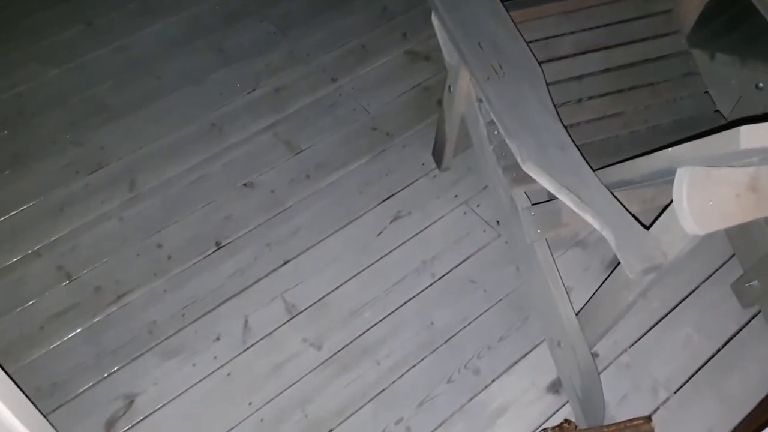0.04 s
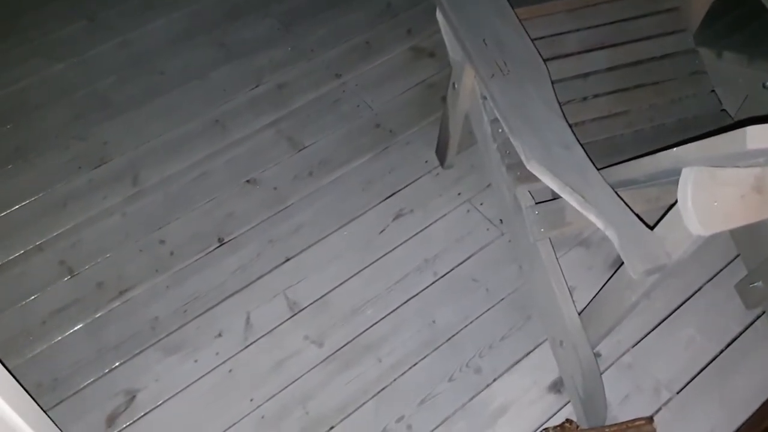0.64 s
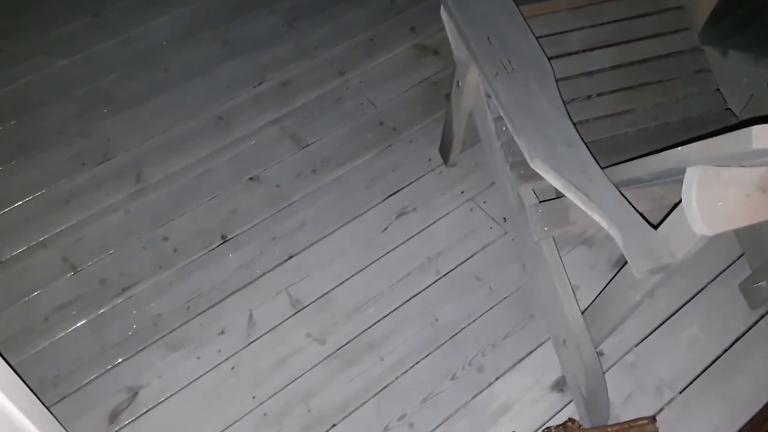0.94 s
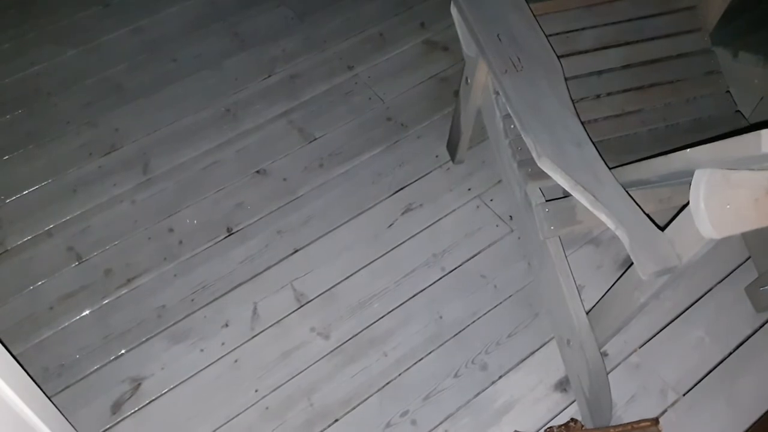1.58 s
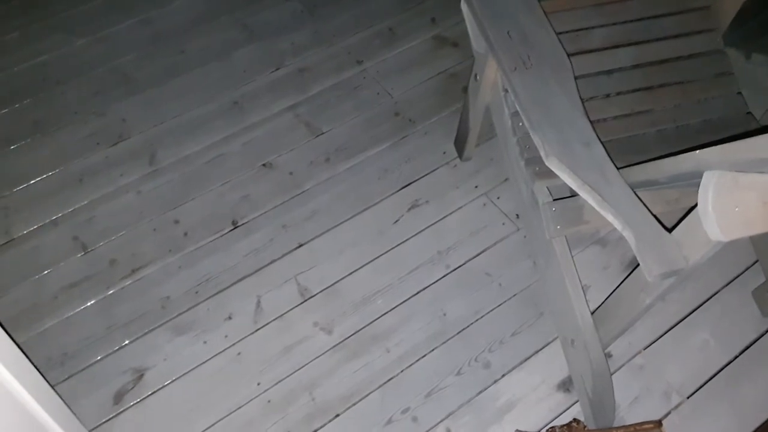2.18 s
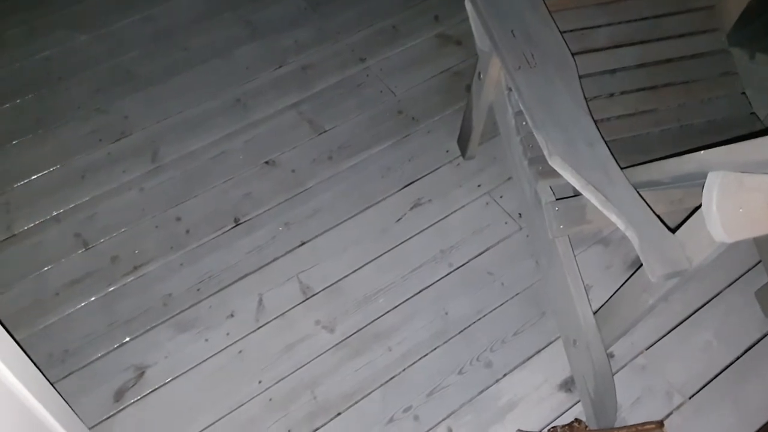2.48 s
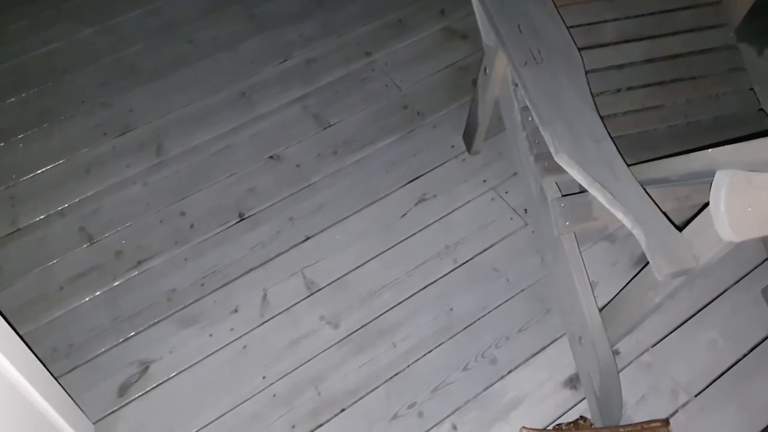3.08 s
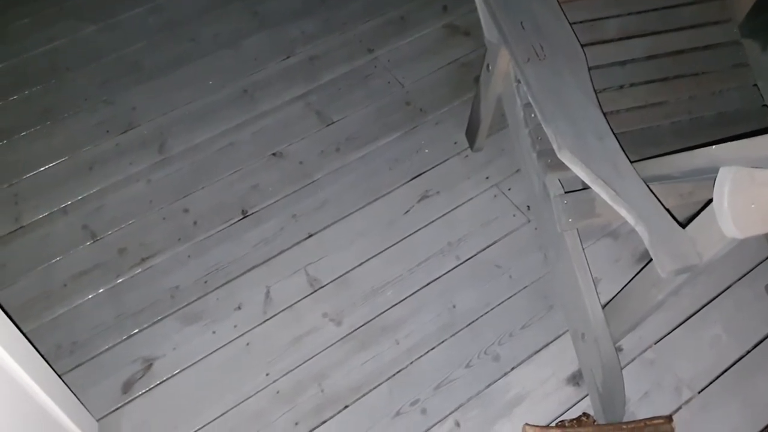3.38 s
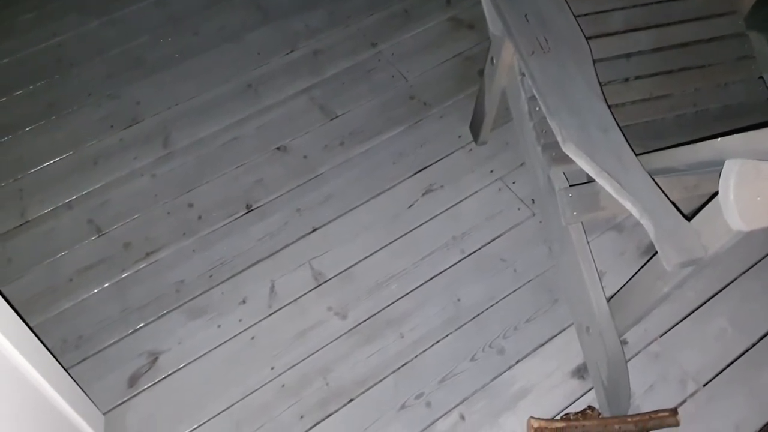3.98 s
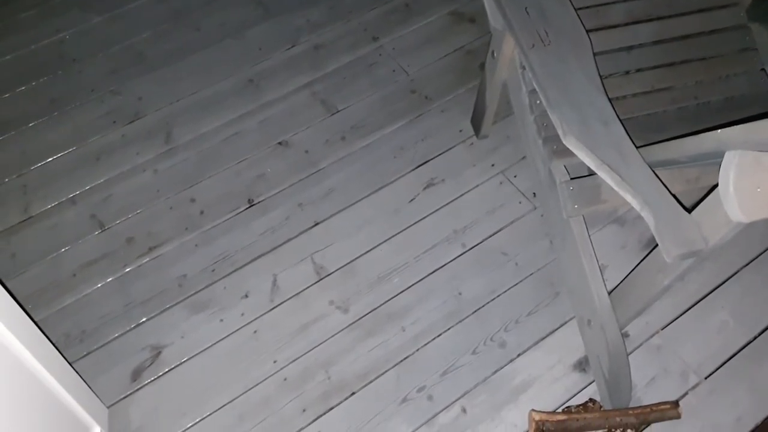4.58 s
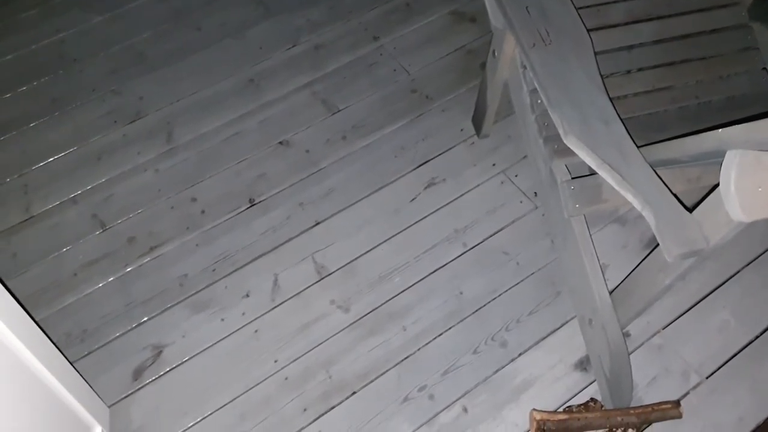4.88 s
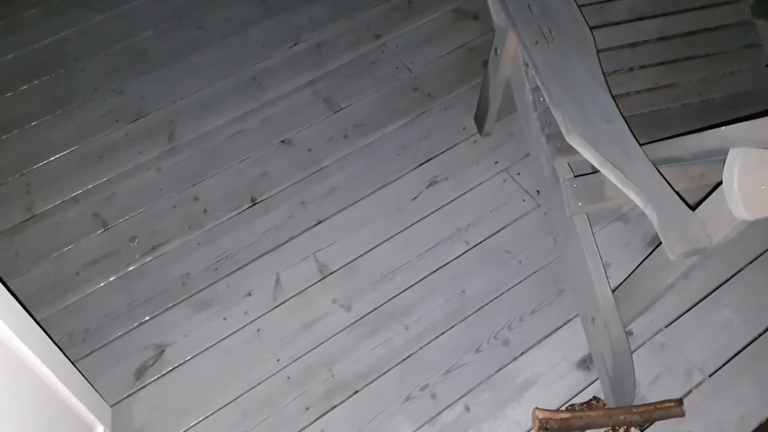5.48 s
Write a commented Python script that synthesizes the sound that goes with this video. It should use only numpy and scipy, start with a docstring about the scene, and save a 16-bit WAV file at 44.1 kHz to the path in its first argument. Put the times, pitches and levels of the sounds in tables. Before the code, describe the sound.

Two badgers fight on a wooden deck at night, snarling, screaming and whining over low growls, thumps and scratching claws.

```python
"""Night beside a wooden deck: two badgers fight a little to the right of the microphone.
A snarl opens, then bodies thump on the boards under three rasping, yelping screams. A rasp and a moan
follow, a soft hiss, a long falling whine and a last hoarse one. Each cry is pulses and breath from the
larynx, shaped by throat, jaws and snout, and the house wall throws it back. All along a low growl
comes and goes in the chest, and claws tick on the wood."""
import sys
import numpy as np
from scipy import signal
from scipy.fft import rfft, irfft, next_fast_len
from scipy.io import wavfile
from scipy.ndimage import uniform_filter1d, map_coordinates

SR = 44100
rng = np.random.default_rng(int(sys.argv[2]) if len(sys.argv) > 2 else 0)


def dump(signal):
    """Clip the signal to [-1, 1] and save it as 16-bit WAV at the path in sys.argv[1]."""
    limited = np.clip(np.atleast_2d(signal).T, -1, 1)
    pcm = np.round(limited * 32767).astype(np.int16)
    wavfile.write(sys.argv[1], SR, pcm)


N = 244314
TIME = np.arange(N) / SR


def from_db(db):
    return np.exp(np.asarray(db) * (np.log(10) / 20))


def rms_one(x):
    return x / np.sqrt(np.mean(x ** 2) + 1e-20)


def butter(x, hz, kind, order=2):
    return signal.sosfilt(signal.butter(order, hz, kind, fs=SR, output="sos"), x)


def follow(rows, t):
    """The columns of a curve at the times t."""
    times, *columns = np.transpose(rows)
    return [np.interp(t, times, column) for column in columns]


def colour(x, spectrum):
    """Shape x with a smooth spectrum."""
    hz, db = np.transpose(spectrum)
    size = next_fast_len(x.shape[-1] + 4096)
    bin_hz = np.maximum(np.arange(size // 2 + 1) * SR / size, 1)
    gain = from_db(np.interp(np.log(bin_hz), np.log(hz), db))
    return irfft(rfft(x, size) * gain, size)[..., :x.shape[-1]]


def drift(rate, t):
    """A smooth random wander of spread about 1, changing about rate times a second."""
    knots = rng.standard_normal(8192)
    coarse = t[::8]
    return np.interp(t, coarse, map_coordinates(knots, [(coarse - t[0]) * rate], order=2, mode="wrap"))


def even(x, window_s=.025):
    """Hold the short-term level at 1."""
    size = int(window_s * SR)
    power = uniform_filter1d(uniform_filter1d(x * x, size), size)
    return x / np.sqrt(np.abs(power) + 1e-14)


def gate_db(t, start, end, attack_s, release_s):
    """0 dB from start to end; attack and release are the times to rise and fall by 30 dB."""
    return -30 * (np.maximum(start - t, 0) / attack_s + np.maximum(t - end, 0) / release_s)


def around(start, end):
    """The times of a cry, with room for its attack and release."""
    return TIME[(TIME >= start - .05) & (TIME <= end + .12)]


def cavity(x, hz, width_hz, block=64):
    """A moving resonance with gain 1 at its peak."""
    radius = np.exp(-np.pi * width_hz / SR)
    zeros = np.array([1, 0, -1]) * (1 - radius ** 2) / 2
    out, state = np.zeros(len(x)), np.zeros(2)
    for i in range(0, len(x), block):
        poles = [1, -2 * radius * np.cos(2 * np.pi * hz[i] / SR), radius ** 2]
        out[i:i + block], state = signal.lfilter(zeros, poles, x[i:i + block], zi=state)
    return out


def pulses(cycles, strength):
    """One click per cycle, placed between samples."""
    at = np.flatnonzero(np.diff(np.floor(cycles)) > 0)
    late = (np.ceil(cycles[at]) - cycles[at]) / (cycles[at + 1] - cycles[at])
    out = np.zeros(len(cycles))
    out[at] += strength[at] * (1 - late)
    out[at + 1] += strength[at] * late
    return rms_one(out)


def night(level_db=-60, apart_hz=500):
    """Still air around the microphone: alike on both sides in the bass, unrelated in the treble."""
    # Each row: frequency in Hz, gain in dB.
    air_colour = [(18, -38), (30, -15.5), (111, 11.5), (443, -14), (767, -12), (1360, -17.5), (2240, -18),
                  (2490, -23), (3490, -27.5), (3980, -20.5), (7080, -24.5), (9190, -32.5), (15500, -36)]
    mid, side = rng.standard_normal((2, N))
    air = mid + butter(side, apart_hz, "high", order=1) * np.array([[1], [-1]])
    return from_db(level_db) * rms_one(colour(air, air_colour))


def scatter(x, t60):
    """A dense, dying cloud of reflections with the same power as x."""
    t = TIME[:SR]
    cloud = rms_one(rng.standard_normal(SR) * (t > .002) * from_db(-60 * t / t60)) / np.sqrt(SR)
    return signal.oaconvolve(x, cloud[t < t60])[:N]


def porch(x, right_db=.6, front_db=-11, sides_db=1.4, tail_db=-19.5, shifts_per_s=.7):
    """Boards and walls scatter the sound, mostly from the sides; the yard adds a faint, dull tail."""
    mid = x + from_db(front_db) * scatter(x, t60=.08)
    turn = 2 * np.pi * shifts_per_s * TIME   # side reflections shift as the animals move
    shifting = scatter(x * np.cos(turn), t60=.125) + scatter(x * np.sin(turn), t60=.125)
    side = from_db(sides_db) * butter(shifting, 850, "high", order=1)   # bass reaches both sides alike
    near = np.array([mid + side, mid - side]) * from_db([[-right_db], [right_db]])
    yard = np.array([scatter(x, t60=.76) for _ in range(2)])
    return near + from_db(tail_db) * butter(yard, [250, 11000], "band", order=1)


def board_bounces(x, delays_ms=(.7, 1.3, 2.3, 3.4), bounce=.59):
    """Quick bounces between the boards blur each pulse in time, without colouring it."""
    centre = int(sum(delays_ms) * SR / 1000)
    x = np.r_[x, np.zeros(centre)]
    for ms in delays_ms:
        taps = np.r_[1, np.zeros(int(ms * SR / 1000)), -bounce]
        x = signal.lfilter(taps[::-1], taps, x + 1e-18)
    return x[centre:]


def claws(t60=.37, grain_db=4):
    """Claws on wood: each scratch is a burst of gritty friction that dies away."""
    # Each row: start in seconds, level in dB.
    scratches = [(0.478, -48.5), (2.345, -52), (3.153, -56), (3.346, -63), (3.686, -48), (3.895, -61),
                 (4.898, -64), (5.18, -69)]
    # Each row: frequency in Hz, gain in dB.
    grit_colour = [(400, 3), (900, -3.5), (2000, -1), (4000, -2.5), (7000, -7), (15000, -25.5)]
    envelope = np.zeros(N)
    for start, db in scratches:
        after = (TIME >= start) & (TIME < start + t60)
        envelope[after] += from_db(db - 60 * (TIME[after] - start) / t60)
    grit = rng.standard_normal(N) * from_db(grain_db * drift(500, TIME))
    return rms_one(colour(grit, grit_colour)) * envelope


def thumps(soft_hz=190, gain_db=-2.8, tumble_db=-31, tumble_t60=.36):
    """A soft, heavy blow and the tumble after it set the boards ringing."""
    # Bodies hitting the deck. Each row: start in seconds, relative level in dB.
    hits = [(0.51, -7), (0.542, -10.5), (0.885, -21), (1.465, -24.5), (1.591, -7), (1.627, -15.5),
            (2.755, -26)]
    # Each row: frequency in Hz, gain in dB, seconds to fall by 60 dB.
    deck_modes = [(58, -17.5, 0.18), (83, -14, 0.49), (104, -9.5, 0.15), (121, -0.5, 0.053),
                  (172.6, -11, .28), (224.7, -19.5, 0.15), (285, -10.5, 0.12), (380, -9.5, .1),
                  (555, -1, .1)]
    force, boards = np.zeros(N), np.zeros(N)
    for start, db in hits:
        decay_db = tumble_db - 60 * np.clip(TIME - start, 0, 1) / tumble_t60
        tumble = (TIME > start) * from_db(decay_db) * rng.standard_normal(N)
        tumble[int(start * SR)] = 1   # the blow itself
        force -= from_db(db + gain_db) * tumble
    force = butter(force, soft_hz, "low", order=3)
    for hz, db, t60 in deck_modes:
        radius, angle = from_db(-60 / (t60 * SR)), 2 * np.pi * hz / SR
        poles = [1, -2 * radius * np.cos(angle), radius ** 2]
        boards += from_db(db) * signal.lfilter([0, np.sin(angle)], poles, force)
    return butter(boards, 55, "high", order=4)


def growl(rate_hz=64, air=1.3, chest_gain=3.0, tussle_db=-2.0, standoff_db=-.6):
    """Slow, ragged pulses in the chest, deeper while the animals are locked together."""
    # Each row: start and length in seconds, relative level in dB, chest resonance in Hz.
    growls = [(0.0, .17, -27.5, 94), (0.445, .02, -35, 105), (0.76, .08, -38, 98), (0.875, .07, -29, 96),
              (1.125, .08, -42, 108), (1.37, .035, -33, 98), (1.465, .1, -29, 100), (1.87, .12, -34.5, 96),
              (2.17, .13, -42, 165), (2.375, .05, -40, 118), (2.588, .025, -37, 106),
              (2.76, .055, -35, 140), (2.91, .09, -39.5, 125), (3.32, .08, -46, 112),
              (3.455, .035, -38.5, 130), (3.57, .11, -49, 170), (3.76, .14, -39, 125),
              (4.22, .11, -38.5, 120), (4.66, .11, -37.5, 113), (5.08, .125, -45.5, 115),
              (5.29, .25, -42, 155)]
    # Soft rumble between growls. Each row: start and end in seconds, relative level in dB.
    rumbles = [(0.0, 1.08, -43), (1.1, 2.42, -49), (2.42, 3.13, -52), (3.32, 3.92, -53), (4.19, 4.89, -55)]
    # The growl's two colours. Each row: frequency in Hz, gain in dB.
    tussle_colour = [(15, -39.5), (25, -6), (64, 7), (83, -1), (179, -7.5), (237, -17.5), (319, -13),
                     (375, -14), (446, -25), (480, -14), (620, -42), (1060, -120)]
    standoff_colour = [(21, -52), (35, -20), (80, 3.5), (125, 0), (233, -9), (443, -16.5), (499, -27),
                       (591, -13), (666, -41), (788, -12.5), (1250, -39.5), (2000, -29.5), (2600, -78),
                       (4400, -120)]
    spells = [(start, start + length, db) for start, length, db, _ in growls] + list(rumbles)
    coarse = TIME[::32]
    power = sum(from_db(db + gate_db(coarse, start, end, attack_s=.055, release_s=.11)) ** 2
                for start, end, db in spells)
    level_db = np.interp(TIME, coarse, 10 * np.log10(power + 1e-12))
    chest_hz, = follow([(start + length / 2, hz) for start, length, _, hz in growls], TIME)
    cycles = np.cumsum(rate_hz * from_db(2.5 * drift(70, TIME))) / SR
    source = pulses(cycles, from_db(4 * drift(90, TIME))) + air * rng.standard_normal(N)
    chest = butter(source + chest_gain * cavity(source, chest_hz, width_hz=35), 42, "high", order=3)
    tussle = from_db(tussle_db) * even(colour(chest, tussle_colour))
    standoff = from_db(standoff_db) * even(colour(chest, standoff_colour))
    apart = np.clip((TIME - 2.1) / .2, 0, 1)
    return from_db(level_db) * ((1 - apart) * tussle + apart * standoff)


def hiss(band_hz=(2200, 3000)):
    """A badger hisses softly through its teeth before the long whine."""
    # Each row: time in seconds, level in dB.
    breath = [(3.98, -91.5), (4.08, -70), (4.18, -69.5), (4.26, -63), (4.32, -90)]
    level_db, = follow(breath, TIME)
    return from_db(level_db) * rms_one(butter(rng.standard_normal(N), band_hz, "band"))


def grunt():
    """A nearly pure, slightly shaky tone from a closed mouth, under the last scream."""
    # Each row: time in seconds, pitch in Hz, level in dB.
    contour = [(2.13, 383, -58), (2.17, 347, -39.5), (2.21, 309, -33.5), (2.245, 352, -61),
               (2.28, 365, -43), (2.32, 335.5, -55)]
    pitch, level_db = follow(contour, TIME)
    phase = 2 * np.pi * np.cumsum(pitch * (1 + .014 * drift(170, TIME))) / SR
    sounding = (TIME > contour[0][0]) & (TIME < contour[-1][0])
    return np.sqrt(2) * np.sin(phase) * from_db(level_db) * sounding


def larynx(t, pitch, rough, doubling, clear_hz, air, wobble, jitter=.03, shimmer=.6):
    """Vocal folds: uneven pulses, alternately strong and weak, and air that escapes on each opening."""
    waver = jitter * rough * drift(300, t) + wobble * rough * drift(70, t) + .00368 * drift(110, t)
    cycles = np.cumsum(pitch * (1 + waver)) / SR
    alternation = doubling * np.cos(np.pi * cycles) * from_db(2.1 * drift(11, t))
    strength = 1 + alternation + shimmer * rough * drift(500, t)
    tone = butter(pulses(cycles, strength), clear_hz, "low", order=3)
    puffs = rms_one(rng.standard_normal(len(t)) * (1 + .49 * np.cos(2 * np.pi * cycles)))
    breathy_top = .76 * butter(puffs, clear_hz, "high", order=4)
    return np.sqrt(1 - rough ** 2) * tone + air * rough ** .5 * puffs + breathy_top


def spit(t, pops_per_s=450, low_hz=4800):
    """Films of saliva burst in clumps in the airstream."""
    pops = rng.random(len(t)) < pops_per_s * from_db(6 * drift(30, t)) / SR
    return rms_one(butter(pops * rng.standard_normal(len(t)) + 1e-18, low_hz, "high"))


def jaws(x, t, mouth_hz, wander=.099):
    """Drawn-back lips raise the upper resonances, and each jerks on its own as the head thrashes."""
    # Each row: centre and width in Hz.
    resonances = [(2800, 230), (3700, 170), (4900, 340), (6400, 330), (8800, 130), (12200, 150)]
    lift = (mouth_hz / 1700) ** .083
    return sum(cavity(x, np.minimum(hz * lift * (1 + wander * drift(48, t)), SR / 3), width)
               for hz, width in resonances)


def snout(x):
    """The snout's steady resonances, strongest in cries with the jaws nearly shut."""
    # Each row: centre and width in Hz, gain in dB.
    resonances = [(1630, 120, -4), (2130, 90, -3), (2880, 110, -9), (3380, 150, 6), (4170, 170, -2),
                  (5730, 200, 1), (7050, 500, -3), (12000, 1200, -2)]
    return sum(from_db(db) * signal.lfilter(*signal.iirpeak(hz, hz / width, fs=SR), x)
               for hz, width, db in resonances)


def cry(t, levels, voice, throat, *, doubling, clear_hz, air, wobble, rattle_hz, rattle_db,
        mouth_gain, mouth_width_hz, gape, nasal, gain_db):
    """The larynx, chopped by flapping throat tissue, sounds through throat, mouth and snout."""
    pitch, rough, mouth_hz = voice
    flap = np.sin(2 * np.pi * np.cumsum(rattle_hz * (1 + .26 * drift(60, t))) / SR)
    source = larynx(t, pitch, rough, doubling, clear_hz, air, wobble) * from_db(rattle_db * rough * flap)
    source += .6 * rough * spit(t)
    source += gape * jaws(source, t, mouth_hz)
    trembling_hz = mouth_hz * (1 + .084 * rough * drift(90, t))   # the tongue and lips tremble
    mouth = cavity(source, trembling_hz, mouth_width_hz)
    call = colour(source + mouth_gain * mouth + nasal * snout(source), throat)
    # low, middle and high registers each follow their own level: a harder push opens the upper ones
    low, low_and_middle = [signal.sosfiltfilt(signal.butter(4, hz, fs=SR, output="sos"), call)
                           for hz in (1300, 3600)]
    registers = low, low_and_middle - low, call - low_and_middle
    out = np.zeros(N)
    out[np.searchsorted(TIME, t)] = sum(even(band) * from_db(db + gain_db + 2.2 * rough * drift(35, t))
                                        for band, db in zip(registers, levels))
    return out


def held_cry(shape, contour, throat, arch_db=2.0, **settings):
    """One held breath: each register swells or fades evenly, and both ends are a little softer."""
    start, end, attack_s = shape[:3]
    t = around(start, end)
    from_middle = np.clip((t - start) / (end - start), 0, 1) - .5
    envelope_db = gate_db(t, start, end, attack_s, release_s=.06) - arch_db * (2 * from_middle) ** 2
    levels = [db + swell * from_middle + envelope_db for db, swell in zip(shape[3:6], shape[6:])]
    return cry(t, levels, follow(contour, t), throat, **settings)


def standoff_cries():
    """An open-jawed rasp, then a moan, a long whine and a hoarse one, sung more through the snout."""
    # Each shape: start, end and attack in seconds, relative low, middle and high levels at mid-cry
    # in dB, then the swell of each from start to end in dB.
    rasp_shape = (2.57, 2.994, .03, -36, -33.2, -48.8, 10, -4, -3)
    moan_shape = (3.47, 3.769, .03, -33, -43.5, -52, 11, 0, 0)
    whine_shape = (4.295, 4.787, .065, -36, -44.5, -55.5, -1.5, 5, 9)
    hoarse_shape = (5.31, 5.54, .05, -42, -50.5, -65.5, 4, 4, 3)
    # Larynx and jaw. Each row: time in seconds, pitch in Hz, roughness 0-1, mouth resonance in Hz.
    rasp_voice = [(2.57, 583, .3, 2320), (2.62, 580, .5, 2010), (2.68, 578, .9, 2020),
                  (2.75, 483, .66, 1250), (2.82, 569, .48, 1090), (2.88, 500, .92, 1020),
                  (2.97, 462, .75, 920), (3.02, 370, .88, 720)]
    moan_voice = [(3.46, 570, .15, 1413), (3.55, 564, .83, 910), (3.59, 574, .36, 607),
                  (3.70, 565, .3, 565), (3.78, 593, .3, 584)]
    whine_voice = [(4.26, 550, .91, 877), (4.33, 574, .48, 1120), (4.41, 583, .25, 1150),
                   (4.50, 558, .2, 1190), (4.60, 545, .15, 1090), (4.66, 534, .52, 1065),
                   (4.77, 523, .64, 1034), (4.82, 490, .7, 980)]
    hoarse_voice = [(5.28, 550, .58, 1000), (5.40, 552, .67, 1050), (5.54, 531, .59, 1040)]
    # Throat colours. Each row: frequency in Hz, gain in dB.
    rasp_throat = [(150, -30), (260, -4), (324, -5), (495, -23), (567, -4), (661, -1), (913, -1.5),
                   (1160, -8.5), (1260, -8.5), (1680, -13.5), (2750, -15.5), (3550, -13), (11100, -35),
                   (15000, -49)]
    moan_throat = [(140, -52), (240, -15), (280, -13), (364, -31.5), (505, -17.5), (580, -13), (666, -4),
                   (909, -4), (1380, -16.5), (1640, -9), (2400, -25.5), (4240, -29.5), (9400, -56),
                   (11800, -57), (15000, -79)]
    whine_throat = [(140, -30), (240, -7.5), (455, -29.5), (551, -2.5), (643, -16), (752, -8.5),
                    (942, -24.5), (1060, -9), (1240, -19), (1640, -4.5), (1950, -11), (4240, -28),
                    (6210, -45), (11600, -53.5), (15000, -67)]
    hoarse_throat = [(140, -33), (240, -4.5), (440, -17), (532, -3), (611, -13.5), (1120, -11.5),
                     (1350, -17), (1640, -10.5), (2660, -28), (3330, -24), (3760, -28), (11200, -48),
                     (15000, -60)]
    rasp = held_cry(rasp_shape, rasp_voice, rasp_throat, gain_db=1.5,
                    doubling=.18, clear_hz=3240, air=.74, wobble=.0394, rattle_hz=65.2, rattle_db=1,
                    mouth_gain=2.34, mouth_width_hz=250, gape=.82, nasal=.2)
    moan = held_cry(moan_shape, moan_voice, moan_throat, gain_db=.66,
                    doubling=.14, clear_hz=833, air=.68, wobble=.046, rattle_hz=76.8, rattle_db=.5,
                    mouth_gain=.87, mouth_width_hz=61, gape=.27, nasal=.98)
    hoarse = held_cry(hoarse_shape, hoarse_voice, hoarse_throat, gain_db=-1.3,
                      doubling=.22, clear_hz=1200, air=1.6, wobble=.066, rattle_hz=60, rattle_db=5,
                      mouth_gain=.18, mouth_width_hz=220, gape=.05, nasal=1.4)
    whine = held_cry(whine_shape, whine_voice, whine_throat, gain_db=0,
                     doubling=.42, clear_hz=1730, air=.98, wobble=.049, rattle_hz=54, rattle_db=6,
                     mouth_gain=.73, mouth_width_hz=290, gape=.066, nasal=.55)
    return rasp + moan + whine + hoarse


def snarl():
    """The opening snarl: the voice shifts between a hoot and an open rasp."""
    # Each row: time in seconds, relative low, middle and high levels in dB.
    levels = [(0.0, -37, -31.5, -47), (0.034, -36, -24.5, -48), (0.084, -24, -42.5, -55.5),
              (0.15, -34, -28.5, -47.5), (0.196, -39, -32.5, -54), (0.224, -29, -28, -58),
              (0.358, -26.5, -30.5, -47.5), (0.41, -53.5, -62, -60)]
    # Each row: time in seconds, pitch in Hz, roughness 0-1, mouth resonance in Hz.
    voice = [(0, 341, .5, 1440), (.09, 324, .55, 930), (.16, 380, .82, 1240), (.21, 332, .76, 980),
             (.37, 326, .65, 960)]
    # Each row: frequency in Hz, gain in dB.
    throat = [(160, -54), (280, -25.5), (372, -21), (502, -44.5), (593, -10.5), (724, -21.5), (993, -2.5),
              (1120, -12), (1660, -11.5), (2030, -26), (2570, -20), (3640, -17.5), (4300, -18),
              (15000, -49.5)]
    t = TIME[TIME <= levels[-1][0]]
    return cry(t, follow(levels, t), follow(voice, t), throat, gain_db=-1.1,
               doubling=.54, clear_hz=4160, air=1.0, wobble=.04, rattle_hz=83.8, rattle_db=3.5,
               mouth_gain=.78, mouth_width_hz=37, gape=.9, nasal=.068)


def screams(shut_mouth_hz=900, shut_pitch_sag=.065, upper_lag_s=.014):
    """Three screams: each yelp in them opens the jaws and lifts level, pitch and mouth resonance."""
    # Each row: start and end in seconds, relative low, middle and high levels between yelps in dB.
    spans = [(0.523, 1.142, -34.5, -38, -40), (1.364, 1.836, -43, -41.5, -48),
             (1.882, 2.285, -41.5, -39, -42)]
    # Each row: time of widest gape and length in seconds, relative low, middle and high levels in dB,
    # pitch in Hz, roughness 0-1, mouth resonance in Hz.
    yelps = [(0.528, .018, -33, -45, -50, 292, .3, 590), (0.562, .045, -45, -26, -30.5, 305, .45, 1730),
             (0.664, .08, -37.5, -26, -31.5, 275, .55, 1900),
             (0.752, .078, -37, -16.5, -30, 460, .42, 2050), (0.9, .055, -45, -22.5, -31.5, 412, .68, 1750),
             (1.015, .07, -42, -20, -29, 475, .55, 2050), (1.103, .07, -43, -18.5, -30.5, 540, .68, 1850),
             (1.392, .03, -28.5, -24, -42, 298, .65, 1540), (1.524, .036, -43, -25.5, -33, 293, .5, 2350),
             (1.658, .066, -37, -21.5, -35, 335, .48, 1750), (1.772, .082, -35, -20, -32.5, 410, .62, 1950),
             (1.922, .046, -39, -24, -28.5, 425, .75, 3100),
             (2.072, .094, -35.5, -18.5, -28, 442, .65, 1850),
             (2.166, .036, -30, -25, -31.5, 405, .58, 1250),
             (2.262, .042, -38.5, -27, -36.5, 325, .7, 1700)]
    # Each row: frequency in Hz, gain in dB.
    throat = [(150, -47.5), (260, -13), (313, -7.5), (513, -21.5), (639, -2.5), (720, -7), (944, 0),
              (1060, -3), (1650, -0.5), (1960, -5.5), (2210, -3), (3370, -16), (3990, -15), (6870, -27.5),
              (15000, -46.5)]
    out = np.zeros(N)
    for start, end, *between_db in spans:
        t = around(start, end)
        own_yelps = [row for row in yelps if start < row[0] < end]
        widest_s, length, *yelp_db, wide_pitch, rough, wide_hz = np.transpose(own_yelps)
        gapes = .5 ** (np.abs(2 * (t[:, None] - widest_s) / length) ** 2.9)   # flat-topped bells
        gates = [gate_db(t, start + lag, end, attack_s=.026, release_s=.075)
                 for lag in (0, upper_lag_s, upper_lag_s)]   # the low register starts first
        levels = [10 * np.log10(from_db(rest) ** 2 + gapes @ from_db(db) ** 2) + gate
                  for rest, db, gate in zip(between_db, yelp_db, gates)]
        opening = np.minimum(gapes.sum(axis=1), 1) ** .38   # rises before the level and falls after it
        pitch = np.interp(t, widest_s, wide_pitch) * (1 - shut_pitch_sag * (1 - opening))
        mouth_hz = shut_mouth_hz * (np.interp(t, widest_s, wide_hz) / shut_mouth_hz) ** opening
        voice = pitch, np.interp(t, widest_s, rough), mouth_hz
        out += cry(t, levels, voice, throat, gain_db=-3.7,
                   doubling=.1, clear_hz=4600, air=.97, wobble=.04, rattle_hz=115, rattle_db=2.5,
                   mouth_gain=3.0, mouth_width_hz=100, gape=2.5, nasal=.017)
    return out


def scene():
    """Cries and claws reach the microphone with their reflections; growl and thumps sit dry, centred."""
    fight = snarl() + screams() + standoff_cries() + claws() + grunt() + hiss()
    return porch(board_bounces(fight)) + growl() + thumps() + night()


def record(dry):
    """The top is cut steeply above 15550 Hz."""
    return signal.sosfilt(signal.ellip(10, .2, 80, 15550, fs=SR, output="sos"), dry)


dry = scene()
out = record(dry)
dump(out)
```